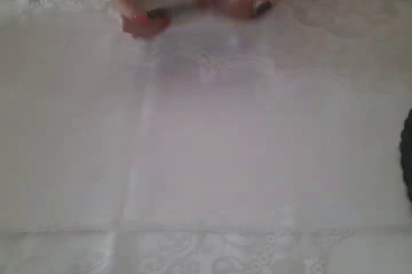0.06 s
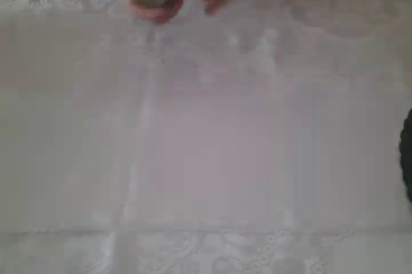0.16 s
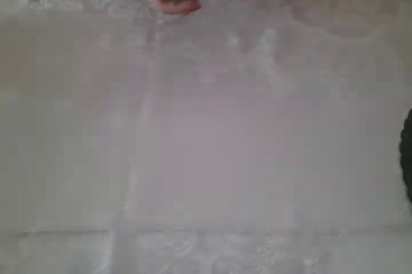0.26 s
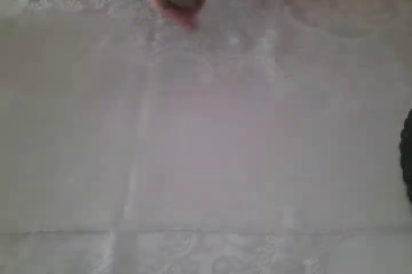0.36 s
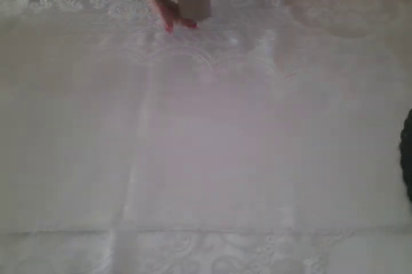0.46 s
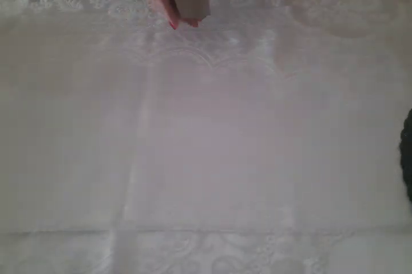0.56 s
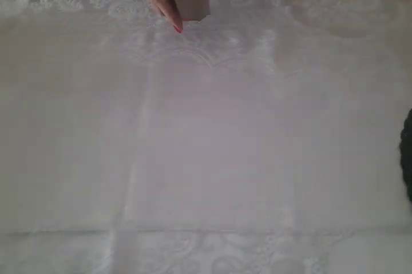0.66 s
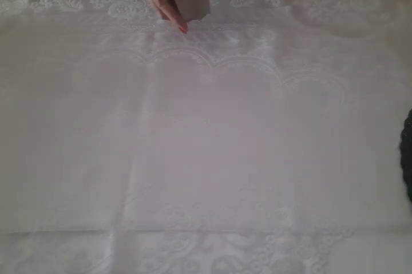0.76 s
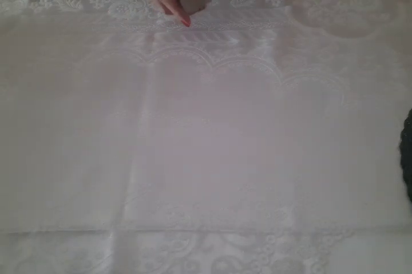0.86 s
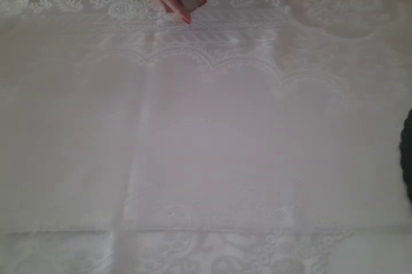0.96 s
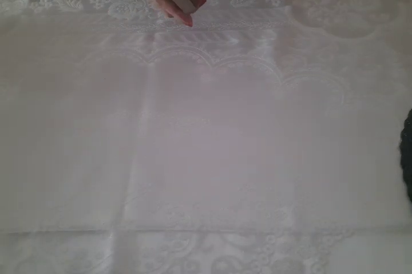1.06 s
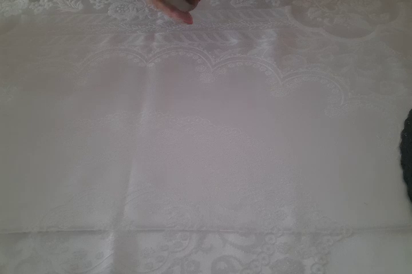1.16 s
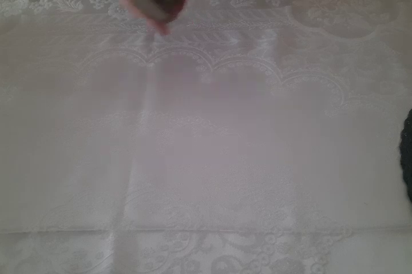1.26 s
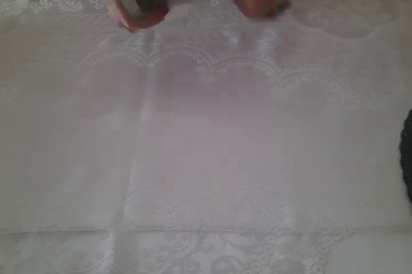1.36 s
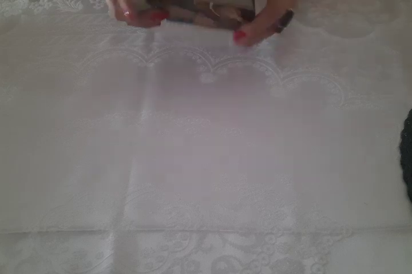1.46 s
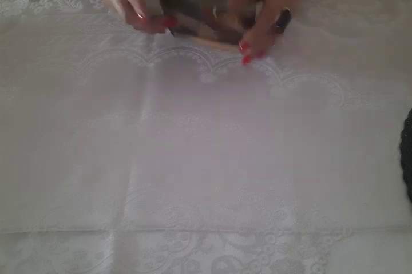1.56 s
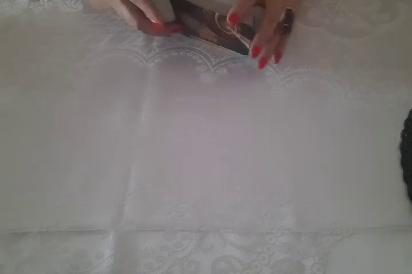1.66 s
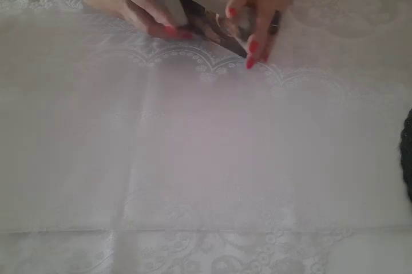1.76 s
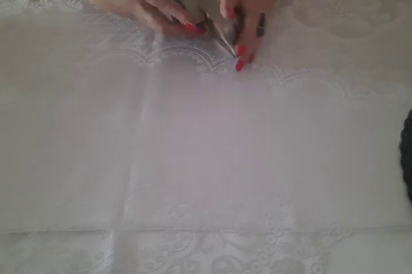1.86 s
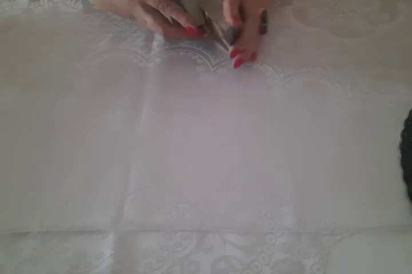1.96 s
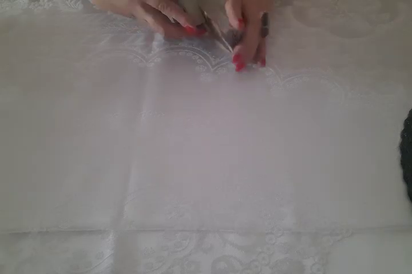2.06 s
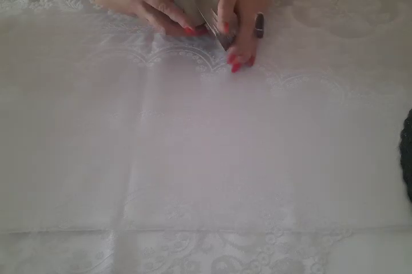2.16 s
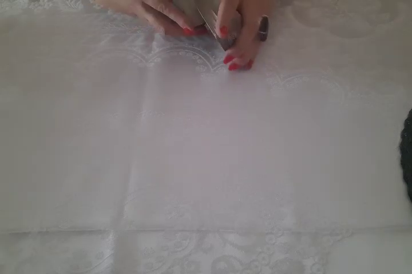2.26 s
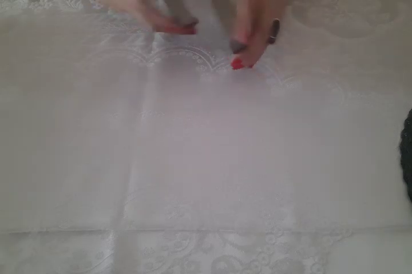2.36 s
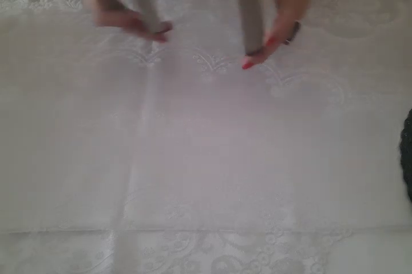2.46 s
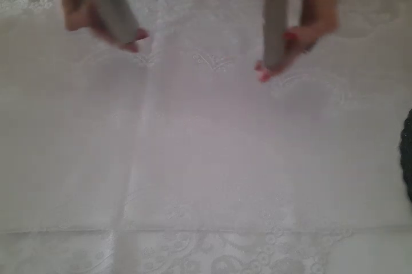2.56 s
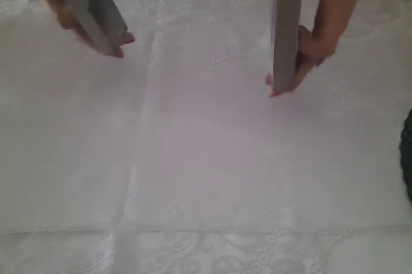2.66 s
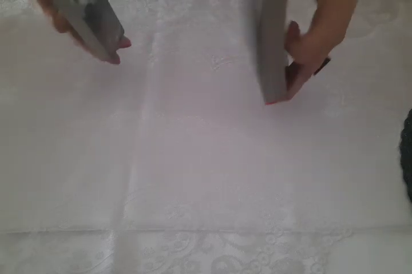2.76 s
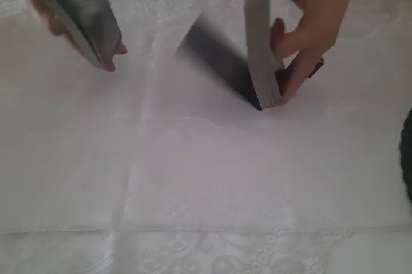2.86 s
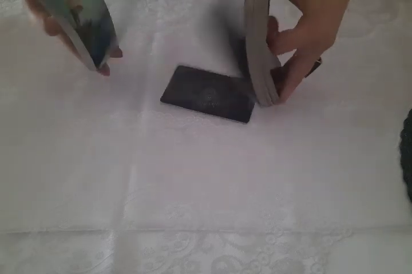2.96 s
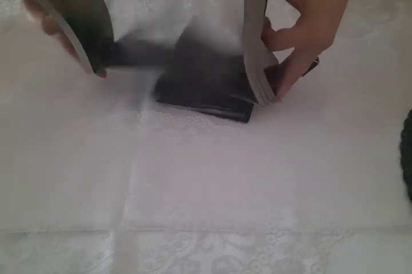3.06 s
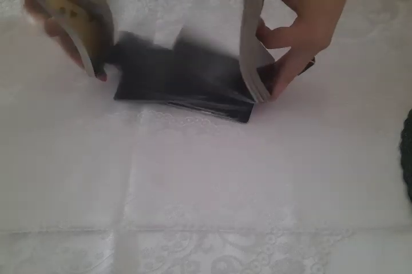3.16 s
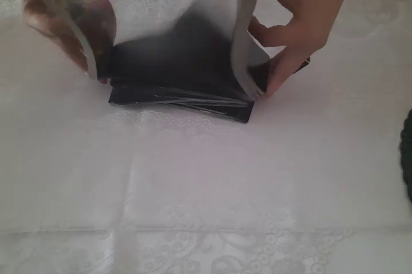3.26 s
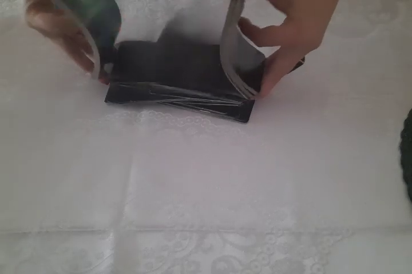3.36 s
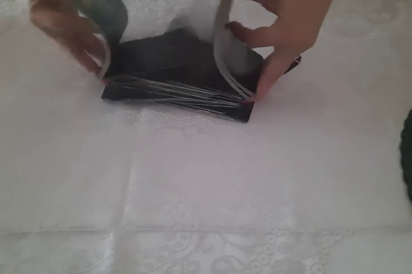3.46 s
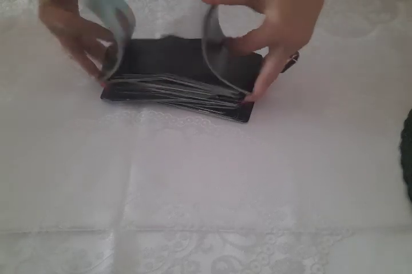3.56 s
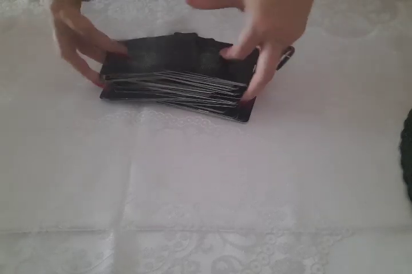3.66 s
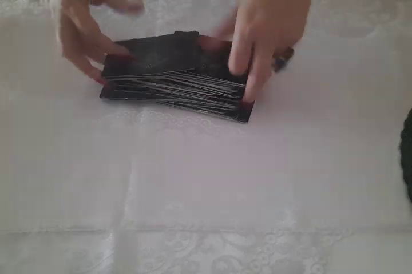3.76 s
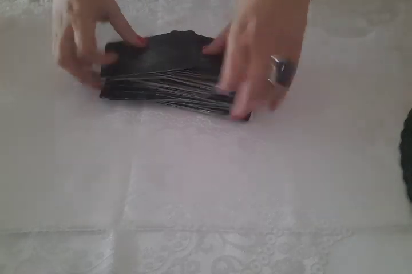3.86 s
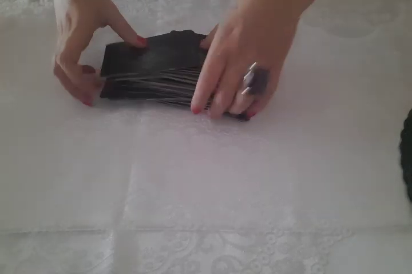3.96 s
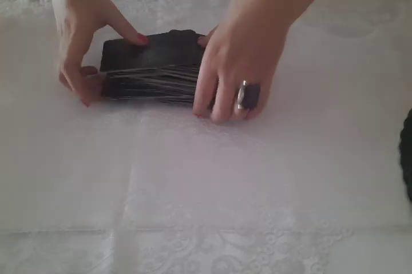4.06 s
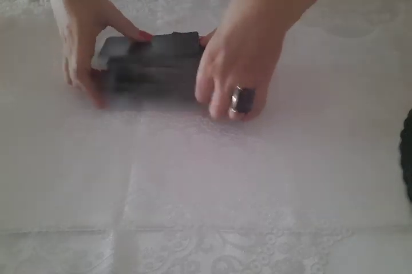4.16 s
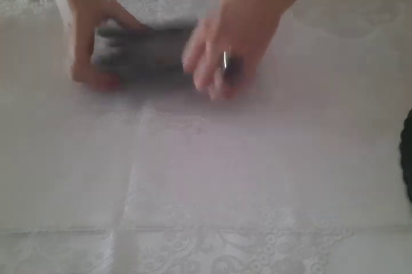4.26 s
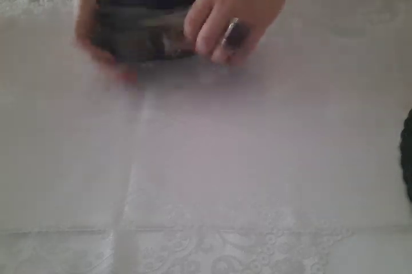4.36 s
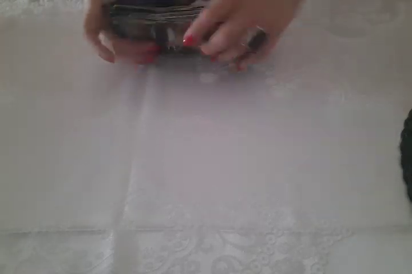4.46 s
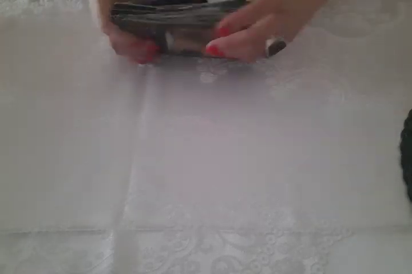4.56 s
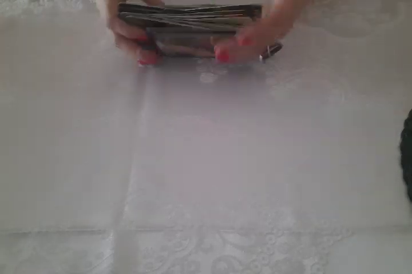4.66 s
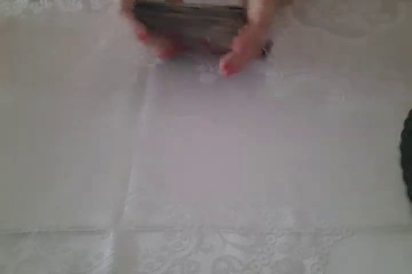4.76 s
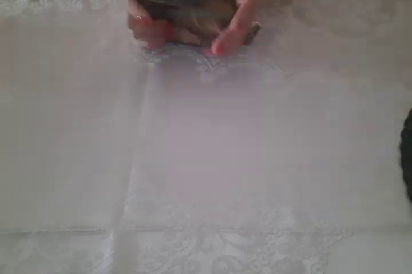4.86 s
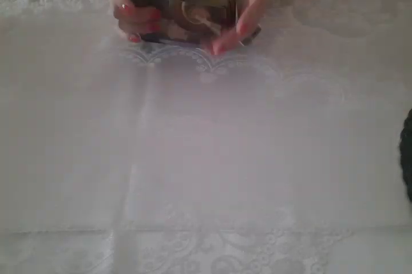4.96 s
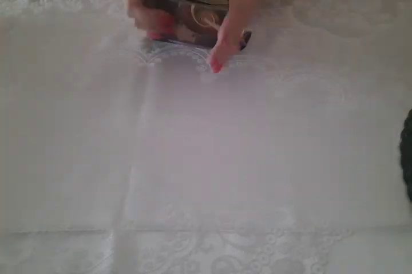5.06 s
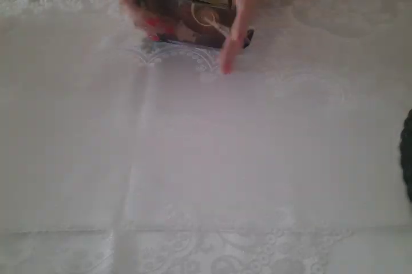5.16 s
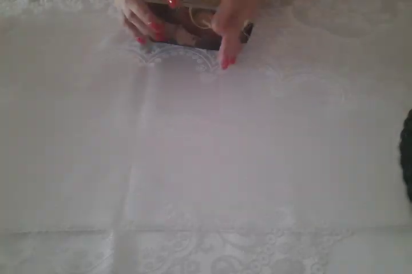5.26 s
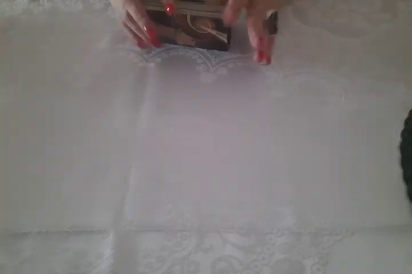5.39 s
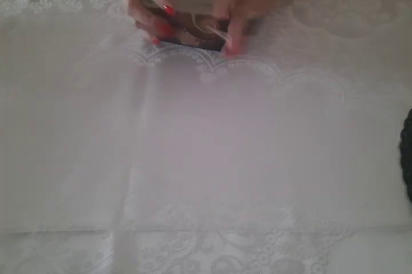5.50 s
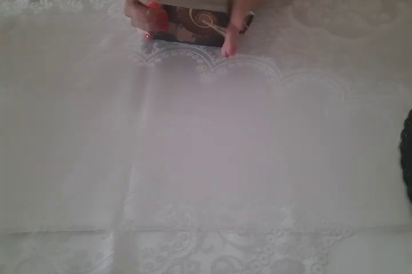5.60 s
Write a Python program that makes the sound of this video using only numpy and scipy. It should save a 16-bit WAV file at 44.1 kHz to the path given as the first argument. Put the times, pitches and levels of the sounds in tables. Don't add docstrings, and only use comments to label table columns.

```python
import sys
import numpy as np
from scipy import signal
from scipy.fft import rfft, irfft, next_fast_len
from scipy.io import wavfile
from scipy.ndimage import uniform_filter1d

SR = 44100
rng = np.random.default_rng(int(sys.argv[2]) if len(sys.argv) > 2 else 0)


def to_wav(s):
    ch = np.atleast_2d(s).T
    pcm = np.round(np.clip(ch, -1, 1) * 32767)
    wavfile.write(sys.argv[1], SR, pcm.astype(np.int16))


def ratio_of_db(decibels):
    return 10 ** (np.asarray(decibels, float) / 20)


N = 248283


def evened(x):
    return x / np.sqrt(np.mean(x ** 2) + 1e-20)


def peaked(x):
    return x / np.sqrt(uniform_filter1d((x[:2] ** 2).mean(0), size=44).max())


def read(points, hz):
    f, value = np.transpose(points)
    return np.interp(np.log(hz + 1), np.log(f + 1), value)


def colour(x, points):
    size = next_fast_len(x.shape[-1])
    gain = ratio_of_db(read(points, np.fft.rfftfreq(size, 1 / SR)))
    return irfft(rfft(x, size) * gain, size)[..., :x.shape[-1]]


def resonate(x, hz, width):
    turn = np.exp(2j * np.pi * np.cumsum(hz * np.ones(x.shape[-1])) / SR)
    r = np.exp(-np.pi * width / SR)
    return 2 * (turn * signal.lfilter([1 - r], [1, -r], x / turn)).real


def gain_track(rows):
    s, db = np.transpose(rows)
    return ratio_of_db(np.interp(np.arange(N) / SR, s, db, left=-150, right=-150))


def stroke(s, db, rise_s, fade_s, bend=1):
    t = np.arange(0, N, 16) / SR - s
    fall = np.maximum(t / max(fade_s, .01), -t / max(rise_s, .005))
    return np.repeat(ratio_of_db(db - 20 * fall ** bend), 16)[:N]


def burst(kick, unlike, length, rise=0.00035):
    t = np.arange(2000) / SR
    noise = rng.standard_normal((3, len(t)))
    decay = np.exp(-(t / (length + rise)) ** 2) + 0.22 * np.exp(-t / (3.0 * length))
    shape = (1 - np.exp(-t / rise)) ** 2 * decay
    near = (noise[0] + unlike * noise[1:]) * shape - kick * np.exp(-t / .00008)
    return np.vstack([near, np.linalg.norm(near[0]) * (t == 8 / SR)])


def add(mix, s, sound, side_db):
    part = mix[:, round(s * SR):][:, :sound.shape[-1]]
    part += (sound * ratio_of_db(np.array([[side_db], [-side_db], [0]]) / 2))[:, :part.shape[1]]


# frequency_hz, likeness
COHERENCE = [(60, .7), (200, .76), (400, .65), (750, .3), (1300, -.1), (2500, .05), (15000, 0)]


def diffuse(pair):
    left, other = rfft(pair)
    same = np.clip(read(COHERENCE, np.fft.rfftfreq(pair.shape[1], 1 / SR)), -1, 1)
    return irfft(np.array([left, same * left + np.sqrt(1 - same ** 2) * other]), pair.shape[1])


# frequency_hz, density_db [dB per Hz]
AIR = [(30, -21.5), (200, -1.5), (460, -8.5), (850, -4.5), (1680, -16.5), (3300, -34.5), (5500, -37.5),
       (13000, -31.5)]
# frequency_hz, width_hz, level_db
ROOM_MODES = [(119.3, 3.5, -9.5), (137, 13, 0), (182.9, 2.8, 1), (306.6, 10, 3), (341.4, 3.6, -4),
              (471, 30, -8.5)]
# start_s, level_db
TRAFFIC = [(0, -61.5), (.4, -59), (.99, -63.5), (1.6, -60), (1.8, -58), (2.18, -66.5), (2.63, -64.5),
           (2.95, -62), (3.9, -62), (4.0, -64), (4.2, -64.5), (4.4, -68.5), (4.52, -57), (4.84, -60),
           (5.63, -61)]


def room_tone():
    air = evened(diffuse(colour(rng.standard_normal((2, N)), AIR)))
    drive = diffuse(rng.standard_normal((2, N)))
    boom = sum(ratio_of_db(db) * evened(resonate(drive, hz, width)) for hz, width, db in ROOM_MODES)
    lowest = evened(resonate(resonate(drive, 60.3, 13.0), 64, 33))
    swell = gain_track(TRAFFIC)
    wide = ratio_of_db(-2) * swell * (swell / swell.mean()) ** 0.7
    return ratio_of_db(-61.5) * air + ratio_of_db(-0.5) * swell * evened(boom) + wide * lowest


# peak_s, level_db, pitch_hz, rise_s, fade_s [s per 20 dB]
WHISTLES = [
    (0.27, -60.5, 2270, 0.1, 0.25),
    (0.78, -66, 3050, -0.36, -0.2),
    (2.7, -65.5, 700, 2, 1),
    (2.58, -70, 2000, 0.27, 0.3),
    (1.4, -71, 3560, 1.2, -1.66),
]
WHISTLE_WIDTHS = [350, 310, 39.74, 900, 710]


def squeak():
    out = np.zeros((2, N))
    for (s, db, hz, rise_s, fade_s), width in zip(WHISTLES, WHISTLE_WIDTHS):
        noise = rng.standard_normal((2, N))
        tone = evened(resonate(resonate(noise, hz, width), hz, width))
        out += tone * stroke(s, db, rise_s, fade_s)
    return out


# frequency_hz, t60_s
DECAY = [(100, 0.66), (300, 0.43), (800, 0.47), (2000, 0.5), (4800, 0.44), (8000, 0.41), (12000, 0.36),
         (16000, .3)]
# frequency_hz, level_db
WALLS = [(100, 5.5), (400, 2), (800, 2.5), (2000, 0.8), (4000, 1.5), (9000, 1.5), (12000, 2), (16500, 2.5)]
# delay_s, level_db
BOUNCES = [(.0095, -19.5), (0.0137, -16.5), (0.0172, -21.5), (.024, -24)]


def room(x, wet_db):
    size = SR // 2
    taps = np.zeros((2, size))
    grid = np.arange(300, size - 20, 12)
    at = grid + rng.integers(0, 12, (2, len(grid)))
    np.put_along_axis(taps, at, rng.choice([-1., 1.], at.shape), 1)
    hz, t, z = signal.stft(diffuse(taps), SR, nperseg=256)
    z = z * ratio_of_db(-60 * t / read(DECAY, hz)[:, None])
    tail = signal.istft(z, SR, nperseg=256)[1][:, :size]
    tail = colour(tail * np.clip(np.arange(size) / SR / 0.0075, 0, 1), WALLS)
    tail *= ratio_of_db(wet_db) / np.linalg.norm(tail[0])
    for s, db in BOUNCES:
        tail[[0, 1], round(s * SR) + rng.integers(0, 25, 2)] += ratio_of_db(db) * rng.choice([-1, 1])
    return x[:2] + signal.fftconvolve(x[2:], tail, axes=1)[:, :N]


# frequency_hz, width_hz, level_db
TABLE_MODES = [(120.3, 8.1, 9), (181, 4.8, 8), (274, 27, -5.5), (330, 16, 3)]


def table(blows):
    boom = sum(ratio_of_db(db) * resonate(blows[2], hz, width) for hz, width, db in TABLE_MODES)
    return np.array([boom, np.roll(boom, 22)])


# frequency_hz, density_db [dB per Hz]
FINE = [(3000, -26), (5300, -10), (6600, 2), (9000, -0.5), (12000, 5.5), (16500, -9)]
# peak_s, level_db, rise_s, fade_s [s per 20 dB]
BRUSHES = [(1.09, -67, 0.46, -1.8), (1.49, -79, .02, -0.5), (2.08, -68, -5, .1), (2.318, -65, -0.1, 0.1),
           (2.56, -75, -1, 0.3), (2.68, -78, 0.2, -0.9), (2.719, -69, .01, 0.2), (2.805, -57, -0.08, -0.9),
           (5.31, -66, -1.2, 0), (5.39, -73, .08, 1), (5.468, -63, -0.38, 0)]


def brushes():
    effort = sum(stroke(s, db, rise_s, fade_s) for s, db, rise_s, fade_s in BRUSHES)
    return evened(colour(rng.standard_normal((3, N)), FINE)) * effort


# frequency_hz, density_db [dB per Hz]
HISS = [(1760, -41.5), (3000, -4), (4800, 3.5), (6390, 7.5), (9660, 3), (12000, 8.5), (16500, -1)]
SCRAPE = [(300, -38.5), (700, 2), (1200, 4.5), (2500, -0.5), (4500, -2), (7000, -40.5)]
# start_s, level_db
FLUTTER = [
    (3.04, -54.5),
    (3.166, -41.5),
    (3.204, -32),
    (3.272, -39),
    (3.462, -32.5),
    (3.542, -57),
    (3.596, -35),
    (3.67, -39),
]
# peak_s, hiss_db, scrape_db, fade_s [s per 20 dB]
RUBS = [(.085, -64.5, -86, -0.29), (.71, -74, -72, -0.14), (.94, -58.5, -56.5, -0.06),
        (1.04, -73.5, -65, -0.17), (1.29, -63.5, -58.5, 0.13), (1.537, -63, -74, -0.87),
        (1.76, -62, -55.5, 0.295), (1.93, -84, -77, -0.56), (2.098, -77.5, -70.5, 0.34),
        (5.196, -64.5, -71, 0.05), (3.02, -55, -61, 0.11), (3.971, -68.5, -63.5, 0.3),
        (4.27, -69.5, -66, 0.37), (4.407, -58.5, -49, 0.07), (4.47, -65, -54, 0.06),
        (4.54, -63, -57.5, 0.07), (4.62, -70, -63.5, 0.1), (4.741, -45.5, -47.5, 0.06),
        (4.9, -64, -60, 0.22), (5.511, -59.5, -54, 0.09)]
# peak_s, hiss_db, scrape_db, fade_s [s per 20 dB]
FLICKS = [(.002, -67, -70, 0.079), (.222, -62.5, -74, 0.22), (1.138, -59, -59, 0.11),
          (1.58, -60, -61, 0.12), (2.33, -78, -70, .08), (2.56, -75, -69.5, 0.21), (2.78, -78, -72, 0.12),
          (2.913, -66, -59.5, .05), (4.171, -66.5, -68, 0.19), (4.577, -65, -50.5, 0.33),
          (5.005, -56, -54.5, 0.059), (5.215, -65, -61.5, 0.14)]


def slides():
    size = ratio_of_db(2.8 * np.minimum(rng.exponential(1, (2, 3, N)), 5))
    size *= rng.random((2, 3, N)) < 5000 / SR
    grit = size * rng.choice([-1., 1.], size.shape) + 0.11 * rng.standard_normal(size.shape)
    clumps = ratio_of_db(2.2 * evened(uniform_filter1d(rng.standard_normal(N), 500)))
    rough = gain_track(FLUTTER)
    smooth = ratio_of_db(-6.5) * rough
    shortest_s = .065
    moves = [(*r, .9 * max(r[-1], shortest_s), 1.6) for r in RUBS] + [(*f, .03, 1) for f in FLICKS]
    for s, hiss_db, scrape_db, fade_s, rise_s, bend in moves:
        shape = stroke(s, 0, rise_s, max(fade_s, shortest_s), bend)
        smooth = smooth + ratio_of_db(hiss_db) * shape
        rough = rough + ratio_of_db(scrape_db) * shape
    hiss = evened(colour(grit[0], HISS) * clumps) * smooth
    scrape = evened(colour(grit[1] + 0.28 * grit[1, :1], SCRAPE) * clumps) * rough
    return hiss * ratio_of_db(2.25) + scrape * ratio_of_db(-4.0)


NONE_DB = -90
# start_s, thump_db, thump_hz, clack_db, side_db [left over right]
KNOCKS = [(1.248, -50.5, 194, -50, -0.5), (1.328, -56, 128, -67, -15), (1.552, -26, 470, -24.5, -3),
          (1.557, -25.5, 558, -28, 10.5), (1.566, -55, 497, -27.5, 6), (1.576, -29.5, 444, -24, 3),
          (3.953, -27, 239, -71, 3), (3.97, -45, 123.2, -78, -2), (3.998, -49.5, 115.6, -64, -4),
          (4.031, -51, 179, -73, 0), (4.085, -43, 290, -62, -2), (4.385, -37.5, 460, -57, -0.5),
          (4.454, -38.5, 410, -43, 5), (4.47, -43.5, 185, -65, 13), (4.587, -41.5, 193, -70, 3),
          (4.871, -53, 139.4, -69, 13), (4.897, -35.5, 410, -52.5, -1), (4.906, -39.5, 425, -50, 0),
          (4.915, -37.5, 395, -48.5, 1), (4.934, -43, 423, -52, 0), (4.54, -38.5, 305, -61, 0),
          (5.219, -37, 350, -44.5, 1), (5.235, -42.5, 400, -55, 5), (5.279, -49, 290, -56, 9),
          (5.323, -59, 137, -61, 0.6), (5.491, -52, 131.5, -79, -17)]
# start_s, thump_db, thump_hz, side_db [left over right]
THUDS = [
    (1.553, -26.5, 275, -8),
    (1.567, -24.5, 272, 15),
    (1.591, -38, 135, -3),
    (3.953, -40.5, 117.6, 3),
    (3.965, -40.5, 318, 8),
    (5.22, -51, 117, 0),
]


def knocks():
    out = np.zeros((3, N))
    thuds = [(s, db, hz, NONE_DB, side_db) for s, db, hz, side_db in THUDS]
    for s, thump_db, thump_hz, clack_db, side_db in KNOCKS + thuds:
        thump = resonate(burst(0, .4, .006, .0015), thump_hz, .8 * thump_hz)
        thump = resonate(thump, thump_hz, 1.3 * thump_hz)
        clack_hz = 1320 + 9 * clack_db
        push = burst(0.61, 0.18, 0.0056, 0.0011)
        clack = resonate(resonate(push, 0.94 * clack_hz, 700), 0.88 * clack_hz, 1140)
        clack = clack + ratio_of_db(-18) * resonate(resonate(push, 2000, 1000), 2000, 1500)
        blow = ratio_of_db(thump_db - 7.5) * peaked(thump) + ratio_of_db(clack_db - 4.5) * peaked(clack)
        add(out, s, blow, side_db - 2)
    return out


# frequency_hz, density_db [dB per Hz]
CRACK = [(2000, -36.5), (3500, 2), (6000, 0), (9500, -3.5), (12500, 0.5), (15500, -5), (17000, -7)]


def snap(slap_db, puff_db, crack_db, hz, length_ms, damping, kick=.006, drag_ms=0):
    length, drag = np.clip(length_ms, .5, 9) / 1000, drag_ms / 1000
    crack = colour(burst(0, 2.2, .35 * length + .0003, .0001 + drag), CRACK)
    crack += 1.5 * resonate(crack, rng.uniform(4000, 14000), 3500)
    crack[2] *= ratio_of_db(-8.0)
    push = burst(kick / length, 0.48, length + 0.001, 0.04 * length + drag)
    slap = resonate(resonate(push, hz, damping * hz), hz, 2.5 * damping * hz)
    slap += ratio_of_db([[-13], [-13], [-10]]) * resonate(push, 2.1 * hz, 1.4 * damping * hz)
    slap = signal.lfilter(*signal.butter(2, 0.29 * hz, "high", fs=SR), slap)
    puff_hz = rng.uniform(350, 480)
    puff = resonate(resonate(burst(0, .2, .003, .001), puff_hz, 400), puff_hz, 600)
    puff = signal.lfilter(*signal.butter(2, 270, "high", fs=SR), puff)
    puff[2] *= ratio_of_db(-7.0)
    return ratio_of_db(crack_db) * peaked(crack) + ratio_of_db(slap_db) * peaked(slap) + ratio_of_db(puff_db) * peaked(puff)


# start_s, slap_db, pitch_hz, length_ms
TAPS = [
    (1.121, -41.5, 890, 2.5),
    (1.313, -34.5, 694, 2.3),
    (1.318, -40, 740, 3.4),
    (1.553, -40, 1850, 1.7),
    (4.572, -20.5, 1070, 1.83),
    (4.584, -27, 1370, 1.5),
    (5.004, -28, 1080, 1),
    (5.02, -43, 1095, 3.3),
]
# start_s, slap_db, crack_db, length_ms
CLICKS = [
    (4.4358, -34, -55, 4.5),
]
# start_s, slap_db, crack_db, length_ms
SCUFFS = [
    (1.288, -53, -63, 11),
    (1.8292, -41, -90, 1.9),
    (4.4368, -36, -66, 3.4),
    (4.7112, -38, -60, 4.5),
]
# start_s, crack_db, side_db [left over right]
TICKS = [(0.2314, -57, 1.5), (1.3114, -39, 3.0), (1.3184, -45, 1.0), (1.5519, -45, 2.5), (2.3181, -55, 2.0),
         (2.5865, -60, 0.0), (2.7162, -59, 3.5), (2.804, -60, 5.5), (3.8104, -42, 1.5), (3.924, -52, 0.5),
         (4.1664, -49, 3.0), (4.33, -56, 2.0), (4.4393, -43, 2.0)]


def lone_cards():
    out = np.zeros((3, N))
    for s, slap_db, hz, ms in TAPS:
        add(out, s, snap(slap_db - 9.0, NONE_DB, NONE_DB, hz, ms, 0.71), .3)
    for s, slap_db, crack_db, ms in CLICKS:
        click = snap(slap_db - 3.5, NONE_DB, crack_db - 6.5, 2570, ms, .12)
        add(out, s, click * [[1], [1], [.2]], .3)
    for s, slap_db, crack_db, ms in SCUFFS:
        scuff = snap(slap_db - 7.0, NONE_DB, crack_db + 8.5, 2500, ms, 0.82)
        add(out, s, scuff * [[1], [1], [.5]], .3)
    for s, crack_db, side_db in TICKS:
        spectrum = FINE if crack_db < -54.5 else CRACK
        tick = peaked(colour(burst(0, 1.6, .0012, .0001), spectrum))
        add(out, s, ratio_of_db(crack_db - 2.5) * tick * [[1], [1], [.5]], side_db - 2)
    return out


# start_s, slap_db, crack_db
LOOSE = [
    (2.9153, -57, -51),
    (2.9244, -72, -79.5),
    (2.9334, -60, -69.5),
    (2.941, -53, -51),
    (2.954, -58.5, -47.5),
    (2.9642, -55, -74),
    (2.986, -39.5, -34),
    (2.998, -45, -41.5),
    (3.0146, -43.5, -48),
    (3.0212, -37.5, -51),
]
# start_s, slap_db, crack_db, puff_db, pitch_hz
JUMPED = [
    (3.0319, -8, -14.5, -32.5, 1840),
    (3.2033, -33, -26.5, -32, 1337),
    (3.2444, -18, -27, -32, 2400),
    (3.3697, -11.5, -17.5, -24.5, 1700),
    (3.3725, -11.5, -18, -25.5, 1396),
    (3.4548, -19.5, -17.5, -31.5, 1890),
    (3.564, -15.5, -38, -28, 1670),
    (3.5904, -12.5, -16, -29.5, 1418),
    (3.6252, -7, -10.5, -26.5, 1902),
]
# start_s, slap_db, crack_db, puff_db, pitch_hz
DRAGGED = [(3.047, -25.5, -38.5, -20, 1940), (3.0554, -30, -30, -30, 3300),
           (3.0607, -27.5, -37.5, -35, 990), (3.0725, -36.5, -44, -39, 2530),
           (3.1039, -20.5, -15.5, -28.5, 1680), (3.112, -22.5, -25, -32, 2930),
           (3.1369, -28, -27.5, -29.5, 1320), (3.223, -24.5, -22.5, -32, 1760),
           (3.252, -20.5, -24, -25, 2580), (3.2771, -23, -27.5, -31.5, 2450),
           (3.304, -22, -17, -30.5, 1700), (3.3265, -23.5, -20, -26.5, 2120),
           (3.3476, -10, -25, -36.5, 1730), (3.3586, -20, -34.5, -27, 2110),
           (3.362, -21.5, -32, -29.5, 900), (3.3845, -19.5, -19.5, -29, 1700),
           (3.395, -22.5, -34, -33, 2120), (3.4135, -24.5, -30, -33.5, 1500),
           (3.421, -20.5, -34, -32.5, 2030), (3.4403, -23, -25.5, -29, 1480),
           (3.461, -25.5, -29, -25.5, 1900), (3.481, -19.5, -24, -25.5, 1470),
           (3.507, -10, -10.5, -18.5, 1650), (3.5169, -23, -40, -20.5, 1750), (3.530, -17, -17, -21, 950),
           (3.567, -20.5, -27.5, -34.5, 2760), (3.576, -25, -29.5, -25.5, 1470),
           (3.593, -24.5, -31.5, -27.5, 1330), (3.6084, -19.5, -23, -27.5, 2180),
           (3.614, -26.5, -31.5, -26.5, 1680), (3.633, -23.5, -33.5, -30.5, 1950),
           (3.637, -26.5, -26.5, -22, 2640), (3.677, -31.5, -44.5, -38, 1900)]
# frequency_hz, width_hz, level_db
PILE = [(830, 180, 5), (1900, 74, 4.5), (2664, 170, -1), (4410, 140, -6.5)]


def riffle():
    out = np.zeros((3, N))
    loose = [(s, slap_db, crack_db, slap_db + 1, 2070 + 20 * (crack_db - slap_db))
             for s, slap_db, crack_db in LOOSE]
    falls = [(*card, .0065, 0) for card in loose + JUMPED] + [(*card, .001, 1.0) for card in DRAGGED]
    for s, slap_db, crack_db, puff_db, hz, kick, drag_ms in falls:
        side_db = rng.normal(0, 1.5)
        length_ms = min(1.49 + 0.4 * (-12 - slap_db), 3.5)
        card = snap(slap_db - .5, puff_db + .5, crack_db + 0.5, hz, length_ms, 1.0, kick, drag_ms)
        add(out, s - .0003 - drag_ms / 1000, card, side_db)
    t = np.arange(N) / SR
    out[2] *= ratio_of_db(np.interp(t, [3.45, 3.6, 3.63], [.1, 1.5, 4.5]))
    deep = out[2] * np.interp(t, [3.58, 3.62], [0, 1])
    out[2] += sum(ratio_of_db(db) * resonate(deep, hz, width) for hz, width, db in PILE)
    return out


def scene():
    light, heavy = riffle() + lone_cards(), knocks()
    near = room(light, -1.33) + room(heavy, 1.3)
    boom = table(ratio_of_db(4.2) * light + ratio_of_db(0.5) * heavy)
    return near + boom + room(slides() + brushes(), -12.5) + squeak() + room_tone()


def roll_off(x):
    return signal.sosfilt(signal.butter(12, 16800, fs=SR, output="sos"), x)


# frequency_hz, level_db
LEAN = [(60, 1.5), (200, 2.5), (900, 3.8), (2400, 2.3), (6000, .6), (9000, 1), (13000, 3.8)]
# frequency_hz, level_db
MIC = [(20, -11.5), (40, -8), (70, -0.5), (110, 3.5), (200, -1.5), (16500, -4.5)]
# frequency_hz, level_db
EDGE = [(15800, 0), (16000, -36), (17500, -45)]


def record(dry):
    left = colour(dry[0], [(hz, db / 2) for hz, db in LEAN])
    right = colour(dry[1], [(hz, -db / 2) for hz, db in LEAN])
    clipped = np.clip(colour(np.array([left, right]), MIC), -1, 1)
    return roll_off(colour(clipped, EDGE))


dry = scene()
out = record(dry)
to_wav(out)
```